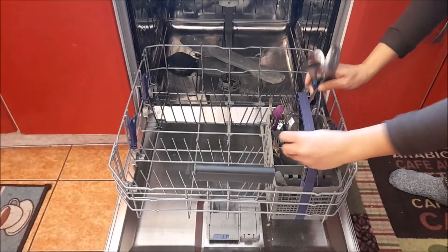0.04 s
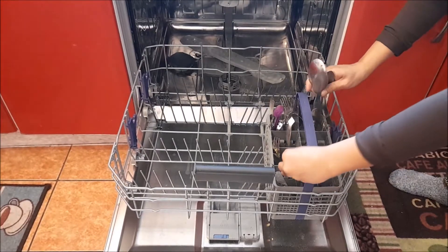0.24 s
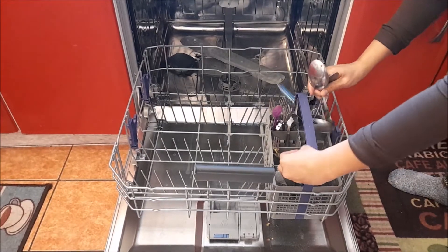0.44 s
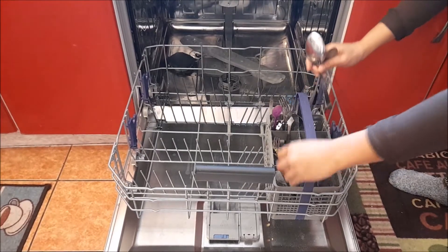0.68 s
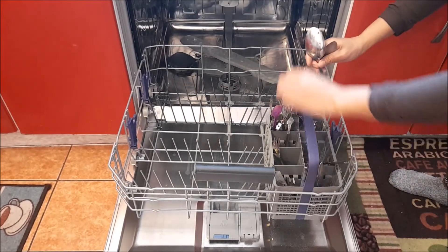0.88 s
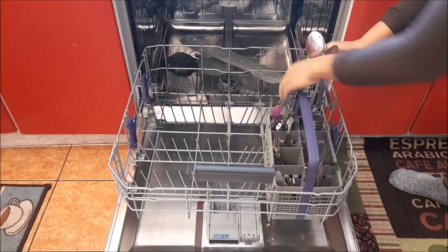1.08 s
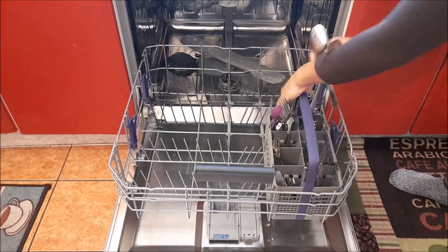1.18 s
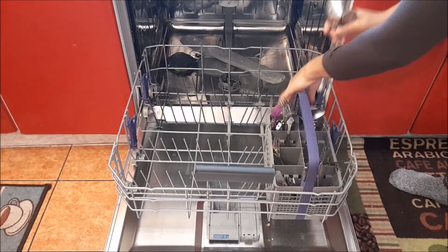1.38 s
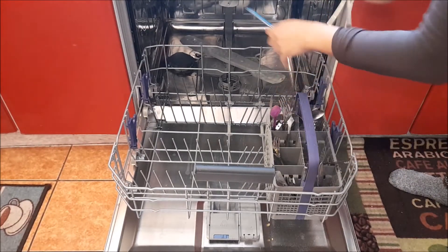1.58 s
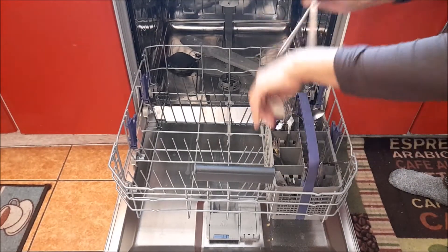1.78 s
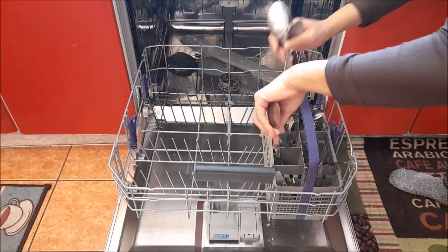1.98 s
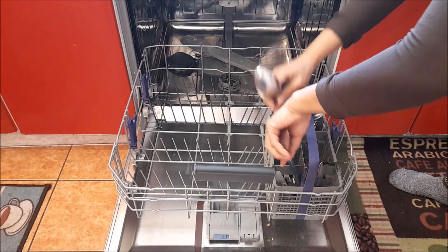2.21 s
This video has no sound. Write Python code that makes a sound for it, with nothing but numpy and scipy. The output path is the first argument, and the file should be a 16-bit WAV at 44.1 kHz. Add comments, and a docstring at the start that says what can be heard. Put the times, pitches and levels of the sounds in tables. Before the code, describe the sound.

Steel cutlery clinks and jangles into a plastic dishwasher basket: one dense rattle, a brief pause, then two shorter clusters. The basket and wire rack knock underneath, heard from nearby in a quiet tiled kitchen.

```python
"""Bright clinks and jangles in three bursts: steel cutlery shuffled and dropped into the plastic
basket of an open dishwasher. Each contact chatters briefly, rings one piece, clashes against its
neighbours, and knocks the basket and the wire rack. Heavier pushes make the steel tub boom faintly,
and a tiled kitchen answers over a bed of quiet air."""
import sys
import numpy as np
from scipy import signal
from scipy.fft import rfft, irfft
from scipy.io import wavfile

SR = 44100
rng = np.random.default_rng(int(sys.argv[2]) if len(sys.argv) > 2 else 0)


def materialize(psi):
    """Save the field psi as 16-bit PCM at rate SR to the path in sys.argv[1].

    A 1-D psi becomes a single channel; in a 2-D psi each row is a channel.
    """
    bounded = np.clip(np.atleast_2d(psi).T, -1, 1)
    quanta = np.round(bounded * 32767).astype(np.int16)
    wavfile.write(sys.argv[1], SR, quanta)


N = 99225
TAIL = 32768  # samples for one hit to die away
TOP_HZ = 15850


def amp(db):
    """Decibels to gain."""
    return 10 ** (np.asarray(db) / 20)


def along(points, hz):
    """Read a curve of (f/Hz, value) points on a log frequency axis."""
    freqs, values = np.transpose(points)
    return np.interp(np.log(hz + 1), np.log(freqs + 1), values)


def unit(x):
    """Scale each channel to energy 1."""
    return x / np.sqrt(np.sum(x ** 2, axis=-1, keepdims=True) + 1e-30)


def body(colour, size=2048):
    """Impulse response of a body with the given colour, minimum phase for a tight attack."""
    gain = amp(along(colour, np.fft.rfftfreq(size, 1 / SR)))
    cepstrum = irfft(np.log(gain))
    cepstrum[1:size // 2] *= 2
    cepstrum[size // 2 + 1:] = 0
    return irfft(np.exp(rfft(cepstrum)))


def through(x, response):
    """A stereo sound passed through a response, at energy 1."""
    return unit(signal.fftconvolve(x, response[None], axes=1)[:, :x.shape[1]])


def room_tone(level_db=-68.5):
    """Faint steady air of the kitchen: dark stereo noise."""
    # colour of the air: f/Hz, level/dB
    air_colour = [(25, -17.5), (80, -11), (350, -9.5), (900, -42), (2200, -16), (5000, -28), (9000, -36),
                  (15500, -23)]
    return amp(level_db) * np.sqrt(N) * through(rng.standard_normal((2, N)), body(air_colour))


def kitchen(direct_db=-11, early_db=-8, early_s=.012, build_cycles=1.4, left_lag_s=.00007):
    """Stereo paths from the basket: direct sound and tub-wall echoes, levelled against the room's tail."""
    # decay of the tiled room: f/Hz, t60/s
    room_t60 = [(100, 1), (260, 0.29), (700, 0.44), (1840, 0.38), (4850, 0.4), (9000, 0.31), (15000, 0.23)]
    # left-right likeness of the tail: f/Hz, correlation
    likeness = [(80, 1), (250, 0.93), (600, 0.14), (2000, 0.024), (15000, 0.0067)]
    hz, t, noise = signal.stft(rng.standard_normal((2, TAIL)), SR, nperseg=256)
    spread = np.arccos(along(likeness, hz))[:, None] / 2
    width = np.array([np.cos(spread), np.sin(spread)])
    build = 1 - np.exp(-(t + t[1]) * hz[:, None] / build_cycles)  # the bass fills the room late
    decay = amp(-60 * t / along(room_t60, hz)[:, None])
    mid, side = signal.istft(noise * build * decay * width, SR, nperseg=256)[1][:, :TAIL]
    paths = unit(np.array([mid + side, mid - side]))
    for ear in paths:
        delays = (rng.random(14) * early_s * SR).astype(int)
        ear += amp(early_db) * unit(np.bincount(delays, rng.standard_normal(14), TAIL))
    paths[0, round(left_lag_s * SR)] += amp(direct_db)
    paths[1, 0] += amp(direct_db)
    return paths


def chatter(length_s, rebounds_per_s=600, rebound_db=2):
    """A first touch and a run of irregular rebounds."""
    times = np.cumsum(rng.exponential(1 / rebounds_per_s, size=64))
    sizes = amp(rebound_db) * rng.uniform(-1.09, 1, size=64)
    kept = times < length_s
    return np.bincount(np.append(0, times[kept] * SR).astype(int), np.append(1, sizes[kept]))


def steel_ring(blow, piece, t60_at_3khz_s=.085, treble_damping=.25):
    """The struck piece rings in its own modes; the higher ones die faster."""
    # modes of each piece of cutlery: f/Hz, level/dB
    piece_modes = { "a": [(2433, -7), (3125, -10), (4543, -11), (4801, -12), (6718, 0), (7110, 0),
                   (7687, -8), (8530, -9), (9915, -10), (11062, -3), (12015, -1), (13035, -4), (13910, -1),
                   (14465, -1), (15633, -7)], "b": [(1397, -5), (5515, -4), (6720, -3), (6847, -6),
                   (12686, 0), (13038, 0), (13108, -3), (14440, -7), (14923, -2), (15331, -6)],
                   "c": [(1421, -2), (1528, -2), (6546, -5), (6933, -6), (7215, -3), (9087, -10),
                   (11369, -7), (11690, -1), (12209, -5), (12772, -4), (12898, -6), (14816, 0),
                   (15460, -6)], "d": [(3130, -6), (3280, -11), (5515, -12), (5596, -10), (6739, -11),
                   (7120, -11), (8548, -16), (9927, -14), (11335, -6), (12775, -3), (13925, 0), (14430, -4),
                   (15635, -7)], "e": [(3130, -19), (7120, -10), (8545, -14), (11089, -11), (11366, 0),
                   (12489, -7), (12695, -7), (13038, -4), (13910, -6), (14440, -2), (14530, -4),
                   (15620, -9)], "f": [(2153, -6), (5515, -2), (5706, -5), (6395, -4), (6738, 0),
                   (7751, -6), (9259, -7), (9862, -8), (11972, -4), (12230, -1), (13055, -2), (14430, -5),
                   (14722, -4), (14857, -5), (15116, -2)], "g": [(2444, -10), (3122, -8), (5515, 3),
                   (6739, -9), (9922, -8), (10794, -8), (11735, -7), (12108, -5), (12688, -5), (13035, -4),
                   (13110, -6), (14440, -7), (14724, -3)], "h": [(3120, 0), (3175, -4), (3280, -5),
                   (3703, -10), (5596, -5), (6745, -6), (11355, -5), (12780, -3), (13925, -4), (14430, -6)]}
    ring = 0
    for hz, db in piece_modes[piece]:
        t60 = t60_at_3khz_s * (3000 / hz) ** treble_damping
        radius = amp(-60 / (t60 * SR))
        feedback = [1, -2 * radius * np.cos(2 * np.pi * hz / SR), radius ** 2]
        ring += amp(db) * unit(signal.lfilter([1, 0, -1], feedback, blow))
    return unit(ring)


def neighbour_clash(blow, jangle_t60_s=.044, jangle_db=-3):
    """A crack and a jangle of brief random modes from the pieces lying around the struck one."""
    # colour of steel on steel: f/Hz, level/dB
    clash_colour = [(500, -36.5), (2000, -12), (3150, 6.5), (4400, 1.5), (5600, 5), (7100, 5), (8200, -7),
                    (9300, -4.5), (10300, -2.5), (12000, 3), (14500, 2), (15700, 2)]
    t = np.arange(SR // 8) / SR
    hz = rng.uniform(2000, TOP_HZ, size=(120, 1))
    modes = rng.standard_normal(hz.shape) * np.sin(2 * np.pi * hz * t)
    jangle = amp(jangle_db) * unit(modes.sum(axis=0) * amp(-60 * t / jangle_t60_s))
    crack = t == 0
    return through(through(blow, crack + jangle), body(clash_colour))


def basket_knock(blow):
    """The plastic basket answers with a dry midrange clack."""
    # colour of the basket: f/Hz, level/dB
    basket_colour = [(40, -62.5), (150, -24.5), (400, -7.5), (900, -7), (1450, -0.5), (1900, 1.5),
                     (2450, 4), (3200, -2), (4300, -2.5), (8000, -20), (16000, -37)]
    return through(blow, body(basket_colour))


def rack_thump(blow):
    """The wire rack takes the blow and adds low-mid weight."""
    # colour of the rack: f/Hz, level/dB
    rack_colour = [(30, -54), (60, -24), (90, -6.5), (150, -12), (220, -2), (290, -4.5), (366, -1),
                   (470, -4.5), (640, -8.5), (780, -7.5), (930, -7.5), (1150, -7.5), (2500, -9.5),
                   (16000, -60.5)]
    return through(blow, body(rack_colour))


def tub_boom():
    """A heavy push sets off the hollow boom of the steel tub."""
    # colour of the tub: f/Hz, level/dB
    tub_colour = [(25, -30), (45, -18), (62, -9.5), (85, 1.5), (105, -12), (140, -13.5), (300, -38.5),
                  (16000, -88.5)]
    return through(kitchen(), body(tub_colour))


def cutlery():
    """Every contact drives the piece, its neighbours, the basket and the rack; pushes boom in the tub."""
    # contacts: t/s, piece, chatter length/s, ring/dB, clash/dB, knock/dB, thump/dB
    contacts = [ (-.15, "c", .01, -64, -60, -49, -40.5), (0.04, "c", 0.0042, -83, -53.5, -85, -49.5),
                (0.0647, "b", 0.0017, -74, -46, -40.5, -42.5), (0.1425, "f", .008, -64, -38.5, -37, -44),
                (0.161, "a", 0.012, -42, -56, -41.5, -78), (0.208, "a", 0.0034, -22.5, -27.5, -37, -50),
                (.228, "a", 0.0082, -26.5, -42, -42, -45.5), (0.265, "c", .014, -45, -20, -24.5, -33),
                (0.2788, "b", .006, -22.5, -28.5, -26.5, -30.5), (.315, "b", 0.011, -31, -25.5, -33, -37.5),
                (0.367, "g", 0.016, -22.5, -19, -26.5, -28.5), (.386, "g", .016, -25.5, -27.5, -36, -35),
                (0.415, "b", .016, -33.5, -29.5, -28.5, -29), (0.487, "c", .003, -33.5, -25, -26.5, -29.5),
                (0.492, "c", 0.01047, -24, -36, -36, -30.5), (0.537, "c", 0.026, -36, -27, -30, -32.5),
                (0.591, "c", 0.0017, -43, -28.5, -36, -36), (0.642, "f", 0.029, -42, -34, -39, -52),
                (0.688, "a", .004, -31, -26, -31, -52), (.692, "e", .005, -29, -36, -46, -53.5),
                (0.739, "d", 0.013, -26, -27.5, -36, -48), (0.797, "h", .008, -33, -31.5, -32.5, -41.5),
                (0.874, "h", 0.014, -53, -48, -58, -48), (1.112, "c", 0.0049, -71.5, -68.5, -64, -94),
                (1.145, "c", 0.0021, -82, -58.5, -56, -69), (1.224, "d", 0.097, -68, -54, -57.5, -92),
                (1.29, "h", .025, -50, -59, -65, -76), (1.315, "d", .02, -57, -52.5, -66, -79),
                (1.341, "e", .006, -36, -43, -47.5, -66), (1.347, "h", 0.0041, -41.5, -45, -52, -59),
                (1.415, "e", 0.017, -62, -39.5, -51, -44.5), (1.449, "e", 0.0048, -38.5, -38.5, -42.5, -56),
                (1.47, "e", 0.018, -28.5, -37.5, -59, -49), (1.523, "c", 0.017, -45, -45, -43.5, -42.5),
                (1.542, "e", .009, -39, -34.5, -38.5, -37), (1.834, "f", .001, -37, -25.5, -32, -45.5),
                (1.851, "f", .018, -38, -24, -29, -66), (1.873, "f", 0.026, -28, -33, -43, -39.5),
                (1.924, "f", 0.025, -35.5, -30.5, -33, -40), (2.004, "f", 0.021, -66, -40.5, -39.5, -54)]
    # heavier pushes: t/s, level/dB
    pushes = [(0.296, -42.5), (.47, -47), (0.619, -47), (0.722, -49), (1.868, -60.5)]
    hits = []
    for start_s, piece, length_s, ring_db, clash_db, knock_db, thump_db in contacts:
        blow = through(kitchen(), chatter(length_s))
        steel = amp(ring_db) * steel_ring(blow, piece) + amp(clash_db) * neighbour_clash(blow)
        knocks = amp(knock_db) * basket_knock(blow) + amp(thump_db) * rack_thump(blow)
        hits.append((start_s, steel + knocks))
    hits += [(start_s, amp(db) * tub_boom()) for start_s, db in pushes]
    track = np.zeros((2, N + 2 * TAIL))  # the lead-in holds a contact before time zero
    for start_s, hit in hits:
        start = TAIL + round(start_s * SR)
        track[:, start:start + TAIL] += np.sqrt(.03 * SR) * hit  # 0 dB: the energy of 30 ms at rms 1
    return track[:, TAIL:TAIL + N]


def scene(pan_db=.75):
    """The cutlery sits a little to the right, over the room tone."""
    return cutlery() * amp([[-pan_db], [pan_db]]) + room_tone()


def record(dry):
    """A steep low-pass trims the very top of the treble."""
    low_pass = signal.firwin(401, TOP_HZ, fs=SR, window=("kaiser", 8))
    return signal.fftconvolve(dry, low_pass[None], mode="same", axes=1)


dry = scene()
out = record(dry)
materialize(out)
```